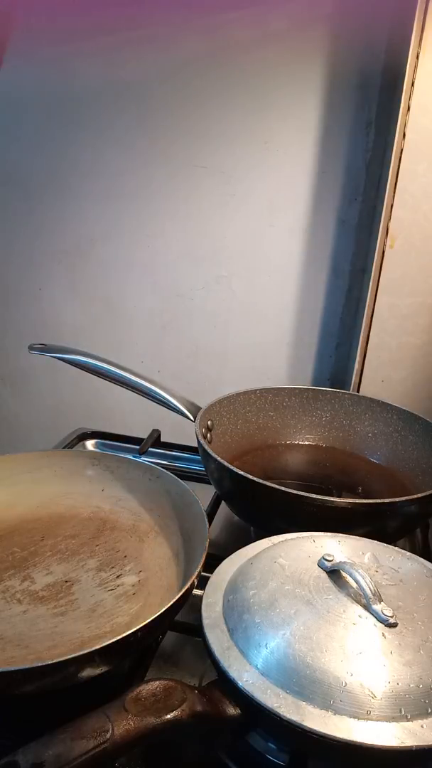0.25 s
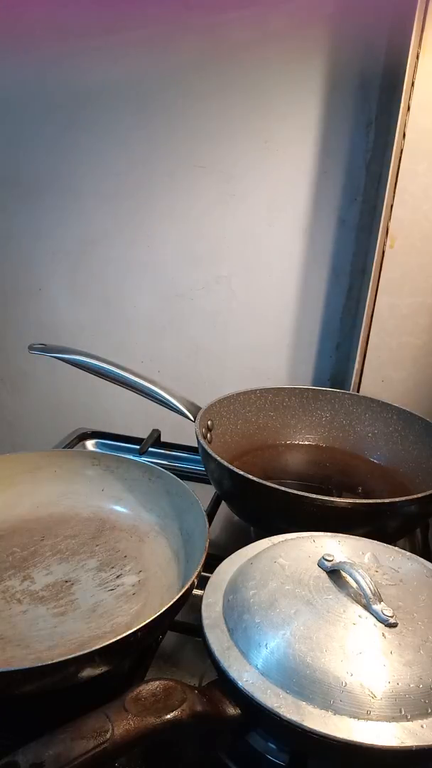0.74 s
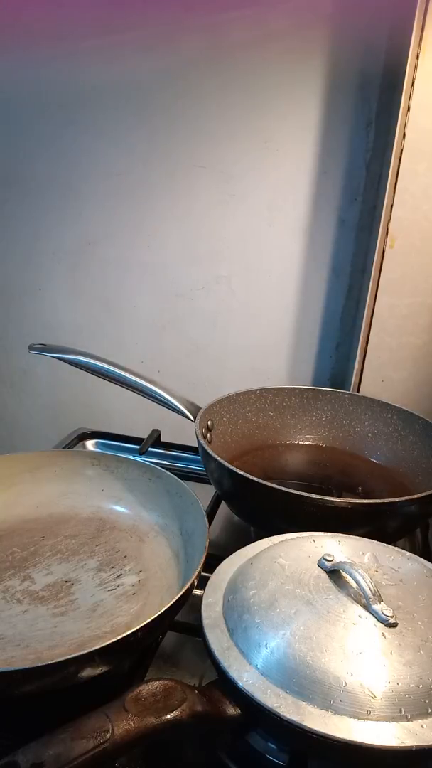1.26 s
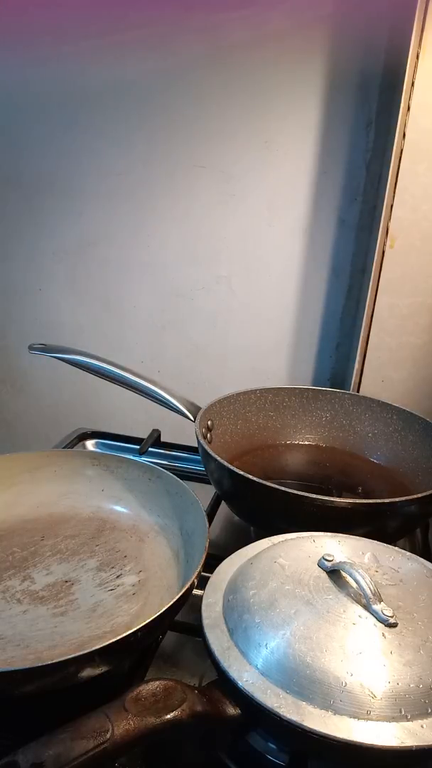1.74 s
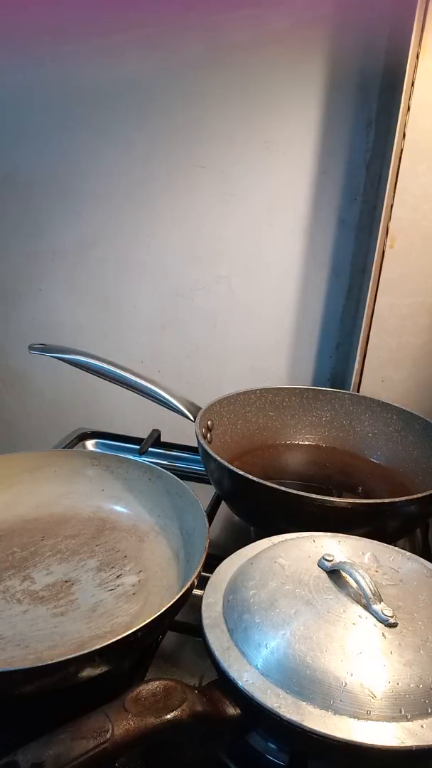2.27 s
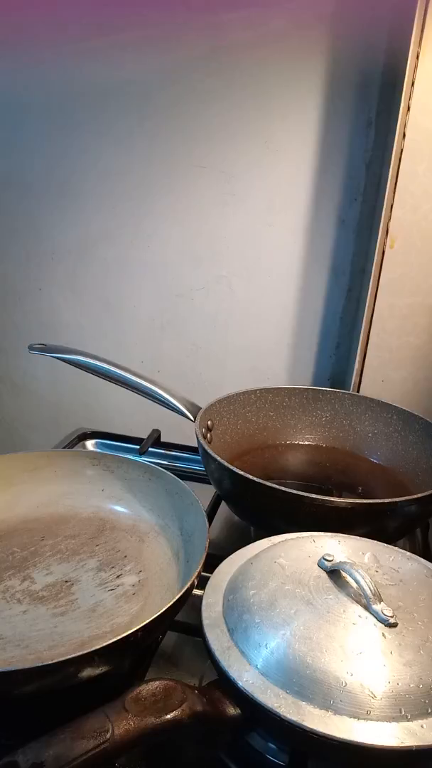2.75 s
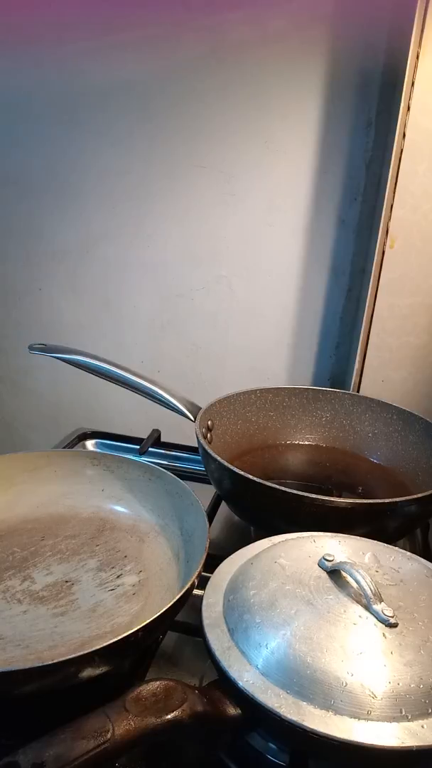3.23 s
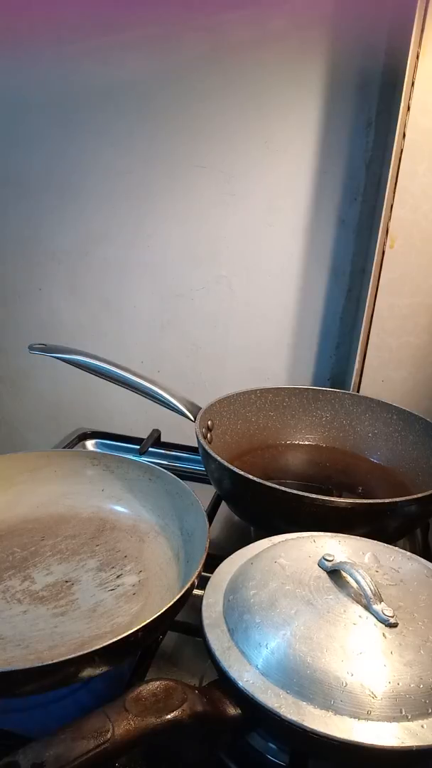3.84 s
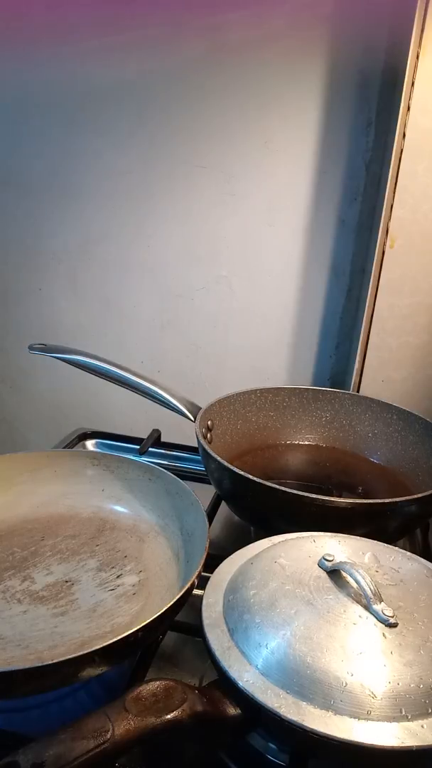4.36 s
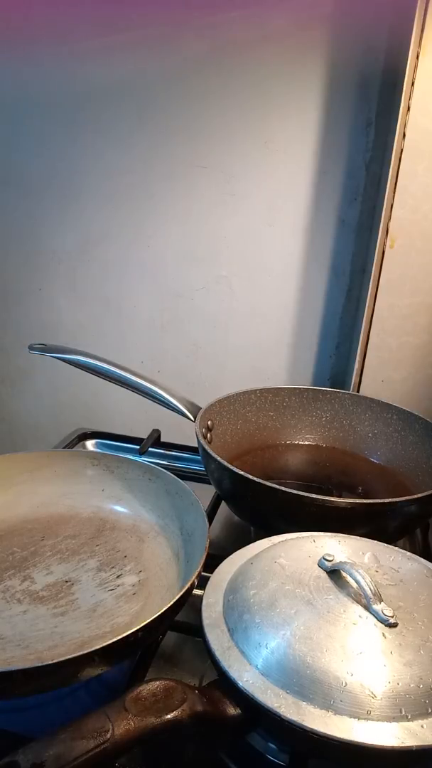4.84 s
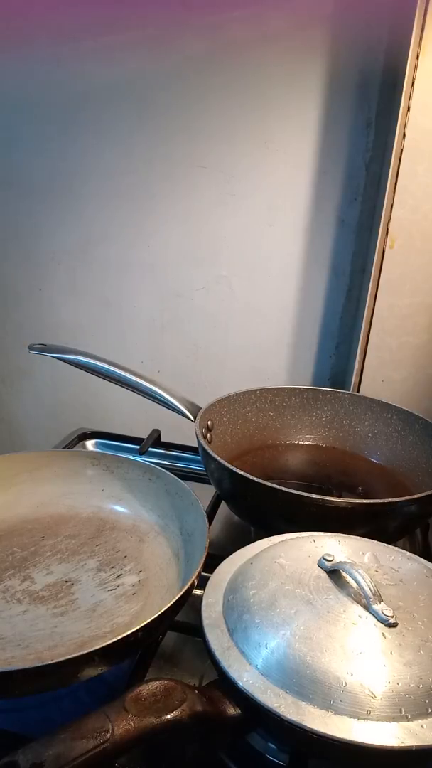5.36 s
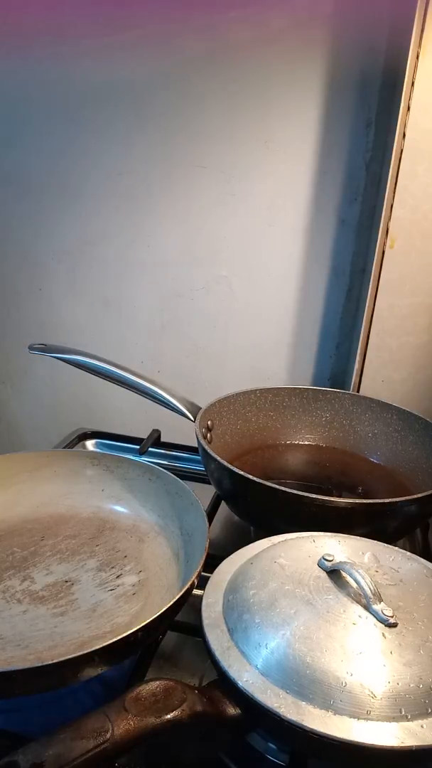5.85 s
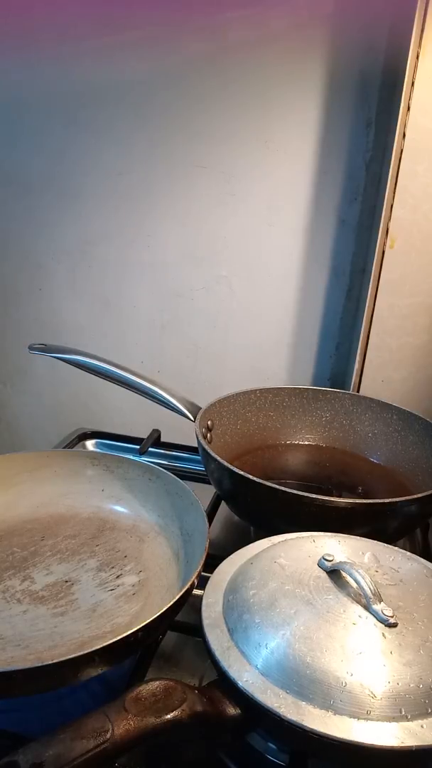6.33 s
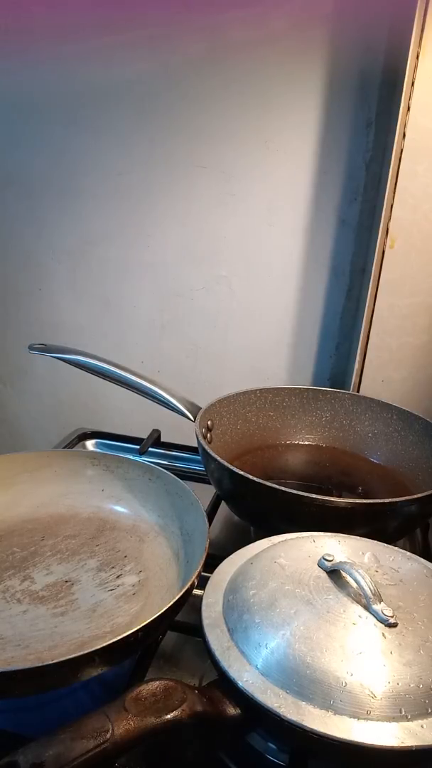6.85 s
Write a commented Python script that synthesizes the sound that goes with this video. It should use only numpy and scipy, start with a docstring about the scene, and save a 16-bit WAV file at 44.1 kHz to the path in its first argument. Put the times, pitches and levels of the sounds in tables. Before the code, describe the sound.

In a quiet kitchen, a hand brushes a hob, the knob clunks in, a rapid run of igniter clicks fires, and gas catches with a soft whoomph.

```python
"""Lighting a gas hob

A small quiet kitchen, with one microphone above a gas hob with pans on it.
A hand brushes the panel and squeaks, a click, then the knob is pushed in: knocks, clacks and a ringing spring.
Twelve igniter sparks, sharp pulses in dense echoes, rattle between hob and pans and ring in the room.
The gas catches with a soft whoomph of low noise, then roars gently, drones under the pan and hisses at its jet.
Pans scrape as they settle and warming metal ticks, over wavering room rumble, faint hiss and hollow tones."""
import sys
import numpy as np
from scipy import signal
from scipy.fft import rfft, irfft
from scipy.io import wavfile
from scipy.ndimage import uniform_filter1d

SR = 44100
rng = np.random.default_rng(int(sys.argv[2]) if len(sys.argv) > 2 else 0)


def file_out(sig):
    """Save sig as 16-bit WAV at sys.argv[1]."""
    # one column per channel
    cols = np.atleast_2d(sig).T
    # limit, then scale
    lim = np.clip(cols, -1, 1)
    pcm = np.round(lim * 32767).astype(np.int16)
    wavfile.write(sys.argv[1], SR, pcm)


N = 313106
TIME = np.arange(N) / SR  # seconds
TOP_HZ = 16700  # nothing sounds above this pitch

# In every *_COLOUR table but HOT_COLOUR: pitch_hz, level_db (per Hz, relative).

# The sparks in turn: crack_db, ring_db (pans and room), echo_db (off the wall, relative to the crack);
# the first two are relative levels
SPARKS = [(-17.5, -34, -7), (-17, -34.5, -9), (-16, -34, -10), (-15.5, -31, -14), (-17.5, -35, -28),
          (-20.5, -34.5, 1), (-15.5, -34, -10), (-14.5, -34.5, -13), (-17, -34.5, -11), (-20.5, -35.5, -11),
          (-17.5, -34, -6.5), (-19, -34, -7)]
# The igniter recharges and fires at a steady pace: first spark, time between sparks
FIRST_SPARK_S, RECHARGE_S = 3.247, 0.1164
# A spark heard from under the pans: pitch_hz, level_db
SPARK_COLOUR = [(400, -48), (900, -20.5), (1400, -14.5), (2200, -18), (3300, -8), (4600, -8.5), (6500, 1),
                (8800, -0.5), (11500, -4.5), (12400, -9.5), (13700, -8.5), (14700, 8.5), (15400, 4.5),
                (15800, -16), (16600, -27)]
# Its ring in the kitchen: pitch_hz, level_db
RING_COLOUR = [(500, -42), (1200, -16.5), (2200, -15.5), (3500, -8.5), (4600, -8.5), (6600, 1), (8800, 0),
               (11800, -8.5), (13800, -7), (14700, 2), (15480, 0.5), (15780, -34)]
# Modes of the pans and the burner cap: pitch_hz, level_db (relative)
PAN_MODES = [(4152, -11), (5975, -9), (6389, 0), (6707, -5), (7345, -1), (7779, -5), (8011, -7), (8274, -6),
             (8743, -7), (8802, -7), (9706, -5), (10267, -9), (10788, -11), (14714, 3), (15166, 2),
             (15306, -3)]
# Short resonances of the gap between hob and pans: pitch_hz (cold), level_db (relative)
GAP_MODES = [(1470, -13.5), (3500, -8.5), (4400, -6), (4700, -13), (5930, -4), (6400, 3.5), (7370, 2),
             (7850, -13), (8350, 2.5), (8890, -4), (9700, -3.5), (11350, -2), (14714, 0)]
# Bands in which the paths through that gap cancel: pitch_hz
GAP_NULLS_HZ = [3420, 4230, 5720, 7500, 8100, 9420, 12200]
# Drift of the sparks' colour once the gas burns: pitch_hz, drift_db_per_s
HOT_COLOUR = [(2600, 2), (4500, 2), (6500, 1), (11000, 0), (15000, 3)]

# Knocks on the hob and its knob: start_s, push_s (rise of the contact),
# thud_db, clack_db, tick_db, ping_db (of the knob's spring); relative levels
KNOCKS = [(1.021, .002, -72, -64, -53, -75), (1.4158, 0.0028, -87, -53.5, -42.5, -45),
          (3.123, 0.0018, -41, -47, -53, -55), (3.1307, .0008, -38.5, -53, -51, -47),
          (3.1471, .0004, -37.5, -48, -45.5, -37), (3.151, .0003, -41, -43, -44.5, -42.5),
          (3.1747, 0.00072, -34, -39.5, -41.5, -60), (3.197, .0008, -34, -49, -67, -66),
          (3.221, .0012, -38, -67, -70, -80)]
# Thud of the hob, clack of the knob, tick of the contact: pitch_hz, level_db
THUD_COLOUR = [(30, -25), (55, -28), (80, 4.5), (120, -12), (200, 2.5), (310, -12.5), (600, -21),
               (1500, -48), (8000, -89)]
CLACK_COLOUR = [(150, -34), (420, 0), (700, -0.5), (980, 4), (1500, -5), (2100, -8), (2700, -9),
                (4000, -34), (9000, -16), (12500, -34), (16000, -83)]
TICK_COLOUR = [(700, -40), (1300, -3.5), (3000, -1.5), (4400, -6.5), (5700, -1), (6800, -0.5), (8200, -5),
               (10500, -24), (13000, -29), (15200, -13), (15900, -55)]
# Modes of the spring and shaft behind the knob: pitch_hz, level_db (relative), t60_s
SPRING_MODES = [(1240, -1.5, 0.26), (1906, -3.5, 0.14), (3060, -15, .15), (5240, -7, .1),
                (5620, 9.5, 0.041), (6100, 5.5, 0.032), (7460, 0, 0.081)]
# Modes of the hob's sheet-metal body: pitch_hz, level_db (relative), t60_s
BODY_MODES = [(80.8, -4, 0.62), (194.4, 3, 0.3), (244, 1, 0.13), (273, -6, 0.26), (596, -9.5, 0.2)]

LIT_S = 3.65  # the moment the gas catches
# Pockets of gas flaring at the burner: start_s, rush_db, thump_db, puff_db
FLARES = [(3.29, -55, -55, -75), (3.649, -43.5, -60, -61), (3.695, -43.5, -46, -62), (3.777, -46, -45, -53),
          (3.797, -48.5, -58, -64), (4.81, -55, -49, -80)]
FLARE_RISE_S, FLARE_T60_S = 0.018, 0.3
# A flare thumps under the pan and puffs through the ports: centre and width of each
THUMP_HZ, THUMP_WIDTH_HZ, PUFF_HZ, PUFF_WIDTH_HZ = 96.8, 19, 1165, 280
# Low flutter under the flame; level and rise of the steady roar
FLUTTER_DB, BURN_DB, BURN_RISE_S = -76, -57.5, 0.2
# The flare's rush and low flutter, and the steady roar: pitch_hz, level_db
WHOOMPH_COLOUR = [(30, -26), (55, -5), (85, 3), (130, -2), (260, 0), (450, -7), (1200, -15.5), (2000, -27),
                  (6000, -47), (16000, -73)]
BURN_COLOUR = [(60, -11), (150, -13), (330, -0.5), (460, 2), (560, -0.5), (800, 0.5), (1200, -5),
               (1700, -11), (2400, -13.5), (4000, -15), (7000, -22.5), (10000, -24.5), (13000, -32.5),
               (15200, -18), (15900, -59)]
# Resonances of the gas jet: pitch_hz (mean), width_hz, level_db (relative)
JET_MODES = [(3150, 134, -2.5), (3140, 560, -6), (2344, 260, -9.5), (6460, 340, -16.5)]

# Two close modes of the hollow under the pan: pitch_hz (upper, lower; mean)
DRONE_HZ = [261.8, 234.6]
# The drone passes between them: time_s, upper_db, lower_db (before a small waver)
DRONE_LEVELS = [(3.9, -80, -82), (4.06, -52, -75), (4.2, -59.5, -72), (4.5, -59, -63), (4.74, -74, -52.5),
                (5.03, -75, -66.5), (5.4, -69, -64), (5.6, -62, -56), (5.82, -56.5, -72),
                (6.02, -54.5, -70), (6.13, -72, -67), (6.35, -53.5, -65), (6.6, -65, -56),
                (6.76, -57.5, -71), (7.1, -66, -73)]

# Strokes of a hand over the panel: start_s, length_s (before the decay), level_db
STROKES = [(0.068, 0.046, -61.5), (0.746, 0.14, -65.5), (0.923, 0.034, -54.5), (1.033, 0.071, -57),
           (1.387, 0.062, -60), (1.71, 0.27, -67.5), (2.406, 0.1, -70)]
# Strokes swell and die away alike; a faint rustle lasts until about when the gas catches
STROKE_RISE_S, STROKE_T60_S, RUSTLE_DB, RUSTLE_END_S = 0.035, 0.67, -69.5, 3.6
# Skin sliding on the panel: pitch_hz, level_db
BRUSH_COLOUR = [(400, 1), (1100, 1.5), (1700, -3), (3400, 1), (5000, -0.5), (6900, 3.5), (9000, -3.5),
                (12800, -23.5), (15200, -5), (15900, -43)]
# Squeaks of skin sticking and slipping: start_s, length_s (before the decay), pitch_hz, level_db
SQUEAKS = [(.14, 0.046, 5750, -65), (.13, .03, 4300, -68), (2.2, .015, 4100, -71)]

# A pan settles on the grate: start_s, level_db (relative)
SHIFTS = [(0.422, -53), (5.322, -44.5)]
# Its scrape: pitch_hz, level_db
SHIFT_COLOUR = [(200, 2), (1100, 2), (1850, 1), (3000, -5), (4300, -18), (14000, -40)]
# The metal ticks as it warms: start_s, level_db
WARMING_TICKS = [(4.698, -53), (5.027, -50.5), (5.944, -59.5)]

# Faint hollow tones that swell and rise a little: start_s (of the crest), level_db
SWELLS = [(.63, -65.5), (1.23, -62), (1.53, -67.5), (1.75, -61.5)]
# All alike: pitch at the crest, glide, width, rise, decay
SWELL_HZ, SWELL_GLIDE_HZ_PER_S, SWELL_WIDTH_HZ, SWELL_RISE_S, SWELL_T60_S = 1114, 370, 89, 0.044, 0.48
# The quiet kitchen: pitch_hz, level_db
AIR_COLOUR = [(25, -18), (48, -27.5), (85, -5), (120, -7.5), (190, -1), (260, 2), (400, -7.5), (560, -23.5),
              (1050, -24.5), (1400, -28.5), (2800, -23), (4600, -29.5), (7000, -29), (10000, -36),
              (12800, -51), (14000, -65), (15300, -28.5), (15900, -51)]
# Hollows among the pans that colour the room's hiss: pitch_hz, width_hz, level_db (before a waver)
HOLLOWS = [(1012, 300, -75), (591, 88, -74), (3123, 130, -79.5), (6400, 200, -83)]
# Low standing waves of the room: pitch_hz, width_hz, level_db
ROOM_MODES = [(77.9, 4.2, -73), (99.6, 5.4, -68.5), (157.5, 7.3, -68)]


def sparks(rise_s=0.00035, crack_t60=0.025, direct_db=-12, echo_s=0.0039, echo_width_s=0.0009,
           fill_s=0.0077, ring_t60=0.34, ring_gain_db=3, modes_db=1.0, modes_t60=0.25, crack_gain_db=0.6,
           cold_change=0.54, hot_change=0.8, ring_change=0.8, gap_db=-3, gap_t60=0.018,
           heat_shift=0.014, clump_db=1.5):
    """Each spark is a sharp pulse in dense, partly shared echo paths; hot air shifts them more once lit."""
    t = TIME[:SR // 2]
    out = np.zeros(N)
    rise = 1 - np.exp(-t / rise_s)
    # the pulse bounces between hob and pan bottoms, and comes back once more off the wall
    early = rise * fade(t, crack_t60)
    echo = np.exp(-((t - echo_s) / echo_width_s) ** 2)
    # part of it slips straight out from under the pan
    pulse = signal.unit_impulse(len(t), int(2 * rise_s * SR))
    direct = undb(direct_db) * np.sqrt(np.sum(early ** 2)) * tint(pulse, SPARK_COLOUR)
    # the room fills within milliseconds and still rings when the next spark comes
    late = (1 - np.exp(-t / fill_s)) * fade(t, ring_t60)
    # its reflections arrive in clumps, the same after every spark
    late = late * unit(undb(clump_db * walk(900)))[:len(t)]
    still = rng.standard_normal(len(t))

    for k, (crack_db, ring_db, echo_db) in enumerate(SPARKS):
        s = FIRST_SPARK_S + k * RECHARGE_S
        lit = s > LIT_S
        # each spark renews part of the echo paths and keeps the rest
        shifted = rng.standard_normal(len(t))
        near = blend(still, shifted, hot_change if lit else cold_change)
        far = blend(still, shifted, ring_change)

        stretch = 1 + heat_shift * lit * rng.standard_normal()
        gap_modes = [(hz * stretch, db, gap_t60) for hz, db in GAP_MODES]
        gap = rise * ringing(t, gap_modes)
        bounces = tint(even(near * (early + undb(echo_db) * echo)), SPARK_COLOUR)
        crack = undb(crack_gain_db) * cancel(direct + bounces) + undb(gap_db) * gap

        pans = ringing(t, [(hz, db, modes_t60) for hz, db in PAN_MODES])
        ring = undb(ring_gain_db) * burst(far, late, RING_COLOUR) + undb(modes_db) * pans
        spark = undb(crack_db) * crack + undb(ring_db) * ring
        add(out, s, tint(spark, spark_colour(s)))
    return out


def blend(still, shifted, share):
    """Replace a share of the echo paths while keeping the noise power."""
    return np.sqrt(1 - share ** 2) * still + share * shifted


def cancel(x, width_hz=130, depth=0.61):
    """Paths between hob and pans partly cancel each other in a few narrow bands."""
    for hz in GAP_NULLS_HZ:
        notched = signal.lfilter(*signal.iirnotch(hz, hz / width_hz, fs=SR), x)
        x = x + depth * (notched - x)
    return x


def spark_colour(s, scatter_db=1.13):
    """Every spark has its own random colour; the heating air slowly changes them all after lighting."""
    bands = np.geomspace(1500, TOP_HZ, 30)
    hz, db_per_s = np.transpose(HOT_COLOUR)
    drift_db = max(s - LIT_S, 0) * np.interp(bands, hz, db_per_s)
    return np.c_[bands, drift_db + scatter_db * rng.standard_normal(len(bands))]


def even(x, size=130, share=0.7):
    """Soften the chance peaks in the spectrum of a burst, keeping its energy."""
    power = uniform_filter1d(np.abs(rfft(x)) ** 2, size)
    hz = np.linspace(1, SR / 2, len(power))
    y = tint(x, np.c_[hz, -share * 10 * np.log10(power)])
    return y * np.sqrt(np.sum(x ** 2) / np.sum(y ** 2))


def burner(flutter_db=2, flicker_db=1.5, jet_db=-7.5, jet_drift=0.007, jet_waver_db=1.2):
    """Gas pockets flare as noise and resonances, then a soft roar burns with a thin whistle from the jet."""
    burning = swell(LIT_S, BURN_RISE_S)
    rush = thump = puff = 0
    for s, rush_db, thump_db, puff_db in FLARES:
        flare = swell(s, FLARE_RISE_S, 0, FLARE_T60_S)
        rush = rush + undb(rush_db) * flare
        thump = thump + undb(thump_db) * flare
        puff = puff + undb(puff_db) * flare
    whoomph = noise(WHOOMPH_COLOUR) * (rush + undb(FLUTTER_DB) * burning) * undb(flutter_db * walk(40))
    whoomph = whoomph + thump * resonance(THUMP_HZ, THUMP_WIDTH_HZ)
    whoomph = whoomph + puff * resonance(PUFF_HZ, PUFF_WIDTH_HZ)

    roar = noise(BURN_COLOUR) * undb(flicker_db * walk(20))
    jet = 0
    for hz, width_hz, db in JET_MODES:
        gain = undb(db + jet_waver_db * walk(9))
        jet = jet + gain * resonance(hz * (1 + jet_drift * walk(5.5)), width_hz)
    return whoomph + undb(BURN_DB) * burning * (roar + undb(jet_db) * jet)


def drone(wobble_hz=3.56, waver_db=1.5, blur_db=-8, width_hz=30):
    """The hollow under the pan hums with the flame: two wobbling tones, each in a thin skirt of turbulence."""
    times, *levels = np.transpose(DRONE_LEVELS)
    out = 0
    for hz, db in zip(DRONE_HZ, levels):
        pitch_hz = hz + wobble_hz * walk(14)
        tone = np.sqrt(2) * np.sin(2 * np.pi * np.cumsum(pitch_hz) / SR)
        gain = np.interp(TIME, times, undb(db), left=0) * undb(waver_db * walk(11))
        out = out + gain * (tone + undb(blur_db) * resonance(hz, width_hz))
    return out


def knocks(thud_t60=0.084, clack_t60=0.21, tick_t60=0.15, room_db=-15, room_t60=0.84,
           rattle_db=0.3, body_db=-4):
    """Each knock thuds in the sheet-metal body, rattles the knob, ticks at the contact and pings the spring."""
    t = TIME[:SR // 2]
    out = np.zeros(N)
    parts = [(THUD_COLOUR, thud_t60), (CLACK_COLOUR, clack_t60), (TICK_COLOUR, tick_t60)]
    for s, push_s, *levels, ping_db in KNOCKS:
        push = 1 - np.exp(-t / push_s)
        for db, (colour, t60) in zip(levels, parts):
            decay = fade(t, t60) + undb(room_db) * fade(t, room_t60)
            add(out, s, undb(db) * burst(rng.standard_normal(len(t)), push * decay, colour))
        add(out, s, undb(ping_db) * push * ringing(t, SPRING_MODES))
        thud_db = levels[0]
        add(out, s, undb(thud_db + body_db) * push * ringing(t, BODY_MODES))
    return out * undb(rattle_db * walk(220))


def brush(grain_db=2.0, squeak_width_hz=600):
    """Skin slides over the panel as noise with a fine uneven grain, and squeaks as narrow resonances."""
    hiss = undb(RUSTLE_DB) * swell(0, STROKE_RISE_S, RUSTLE_END_S, STROKE_T60_S)
    for s, length_s, db in STROKES:
        stroke = undb(db) * swell(s, STROKE_RISE_S, length_s, STROKE_T60_S)
        hiss = np.hypot(hiss, stroke)  # powers add
    squeak = 0
    for s, length_s, hz, db in SQUEAKS:
        envelope = swell(s, STROKE_RISE_S, length_s, STROKE_T60_S)
        squeak = squeak + undb(db) * envelope * resonance(hz, squeak_width_hz)
    return (hiss * noise(BRUSH_COLOUR) + squeak) * undb(grain_db * walk(150))


def shifts(rise_s=0.0071, scrape_t60=0.19, room_db=-16, room_t60=0.95, grit_db=3):
    """A pan settles on the grate with a short, dull scrape of noise, roughened by fast level changes."""
    t = TIME[:SR // 2]
    out = np.zeros(N)
    decay = fade(t, scrape_t60) + undb(room_db) * fade(t, room_t60)
    scrape = (1 - np.exp(-t / rise_s)) * decay
    for s, db in SHIFTS:
        add(out, s, undb(db) * burst(rng.standard_normal(len(t)), scrape, SHIFT_COLOUR))
    return out * undb(grit_db * walk(500))


def warming(snap_t60=0.057, room_db=-13, room_t60=0.44):
    """Tiny bright ticks of expanding metal, with the room colour of the sparks."""
    t = TIME[:SR // 2]
    out = np.zeros(N)
    decay = fade(t, snap_t60) + undb(room_db) * fade(t, room_t60)
    for s, db in WARMING_TICKS:
        add(out, s, undb(db) * burst(rng.standard_normal(len(t)), decay, RING_COLOUR))
    return out


def swells():
    """A faint hollow tone comes and goes in the background, a narrow resonance rising each time."""
    out = 0
    for s, db in SWELLS:
        pitch_hz = SWELL_HZ + SWELL_GLIDE_HZ_PER_S * (TIME - s)
        envelope = swell(s, SWELL_RISE_S, 0, SWELL_T60_S)
        out = out + undb(db) * envelope * resonance(pitch_hz, SWELL_WIDTH_HZ)
    return out


def kitchen(air_db=-56.0, waver_db=2.5, hollow_waver_db=4.5):
    """Low room rumble that wavers, under a faint hiss whose hollow bands come and go."""
    air = noise(AIR_COLOUR)
    rumble = signal.sosfiltfilt(signal.butter(2, 1200, fs=SR, output="sos"), air)
    hiss = air - rumble
    hollows = sum(undb(db + hollow_waver_db * walk(8.7)) * resonance(hz, width_hz)
                  for hz, width_hz, db in HOLLOWS)
    standing = sum(undb(db) * resonance(hz, width_hz) for hz, width_hz, db in ROOM_MODES)
    return undb(air_db) * (rumble * undb(waver_db * walk(25)) + hiss) + hollows + standing


def walls(x, echo_db=-18):
    """The splashback and nearby pans return six early echoes, which ripple the spectrum above the bass."""
    bright = signal.sosfilt(signal.butter(2, 400, "high", fs=SR, output="sos"), x)
    lags = (rng.uniform(0.002, 0.02, size=6) * SR).astype(int)  # 2 to 20 ms
    return x + undb(echo_db) * sum(np.pad(bright, (lag, 0))[:N] for lag in lags)


def burst(paths, envelope, colour):
    """A short coloured burst of dense echoes that carries exactly the energy of its envelope."""
    x = tint(paths * envelope, colour)
    return x * np.sqrt(np.sum(envelope ** 2) / np.sum(x ** 2))


def ringing(t, modes):
    """A struck object: fading sines of random phase from pitch_hz, level_db, t60_s rows."""
    total = 0
    for hz, db, t60 in modes:
        tone = np.sin(2 * np.pi * (hz * t + rng.random()))
        total = total + undb(db) * tone * fade(t, t60)
    return total / np.sqrt(len(modes) / 2)


def resonance(hz, width_hz):
    """A resonance shaken by turbulence, at rms 1; its centre may move."""
    push = rng.standard_normal(N) + 1j * rng.standard_normal(N)
    sway = signal.sosfilt(signal.butter(2, width_hz / 2, fs=SR, output="sos"), push)
    carrier = np.exp(2j * np.pi * np.cumsum(hz * np.ones(N)) / SR)
    return unit((sway * carrier).real)


def noise(points):
    """Full-length noise of a given colour."""
    return tint(rng.standard_normal(N), points)


def tint(x, points):
    """Causal minimum-phase filter with a pitch_hz, level_db colour; white noise keeps its power."""
    size = 2048
    hz, db = np.transpose(points)
    f = np.maximum(np.arange(size // 2 + 1) * SR / size, 1)
    gain = unit(undb(np.interp(np.log(f), np.log(hz), db)))
    # folding the cepstrum forward in time gives the minimum phase
    cepstrum = irfft(np.log(gain))
    cepstrum[1:size // 2] *= 2
    cepstrum[size // 2 + 1:] = 0
    response = irfft(np.exp(rfft(cepstrum)))
    return signal.fftconvolve(x, response)[:len(x)]


def walk(rate):
    """Smooth random wander of rms 1, with a fresh value drawn rate times a second."""
    k = int(SR / rate)
    steps = np.repeat(rng.standard_normal(N // k + 1), k)
    smooth = uniform_filter1d(uniform_filter1d(steps, k), k)
    return unit(smooth[:N])


def swell(s, rise_s, hold_s=np.inf, t60=1):
    """An envelope that rises smoothly to 1 at time s, holds, then dies away."""
    rise = np.exp(-(np.minimum(TIME - s, 0) / rise_s) ** 2)
    return rise * fade(np.maximum(TIME - s - hold_s, 0), t60)


def fade(t, t60):
    """Exponential decay from time 0, by 60 dB in t60 seconds; silent before."""
    return (t >= 0) * np.exp(-np.log(1000) * np.abs(t) / t60)


def add(out, s, x):
    """Mix x into out at time s."""
    i = int(s * SR)
    out[i:i + len(x)] += x[:N - i]


def undb(db):
    """Decibels to gain."""
    return 10 ** (np.asarray(db) / 20)


def unit(x):
    """Scale to rms 1."""
    return x / np.sqrt(np.mean(x ** 2))


def scene():
    """Everything at one microphone above the hob; wall echoes join the hand, burner and background."""
    struck = sparks() + knocks() + shifts() + warming()
    steady = brush() + burner() + swells() + kitchen()
    return (struck + drone() + walls(steady))[None]


def record(dry):
    """A steep low-pass leaves nothing above TOP_HZ."""
    return signal.sosfilt(signal.ellip(10, 0.2, 80, TOP_HZ, fs=SR, output="sos"), dry)


dry = scene()
out = record(dry)
file_out(out)
```